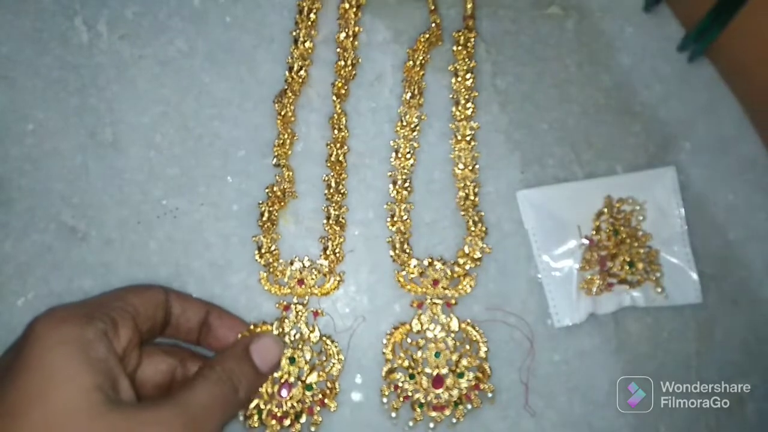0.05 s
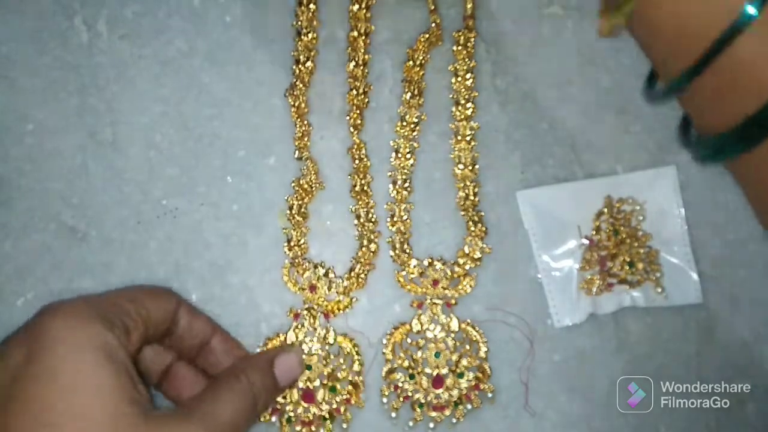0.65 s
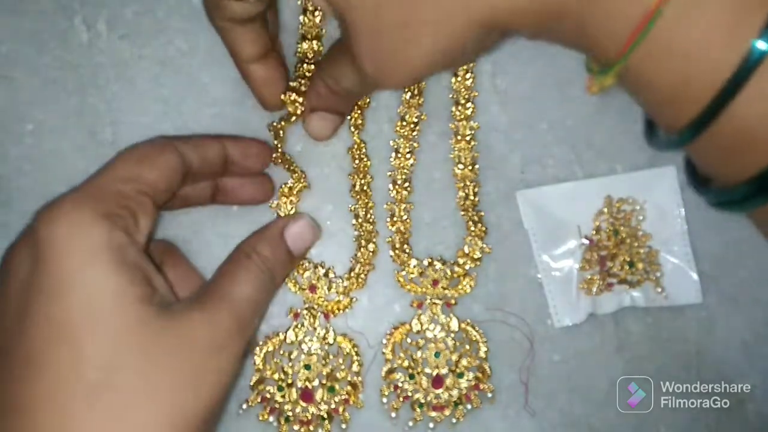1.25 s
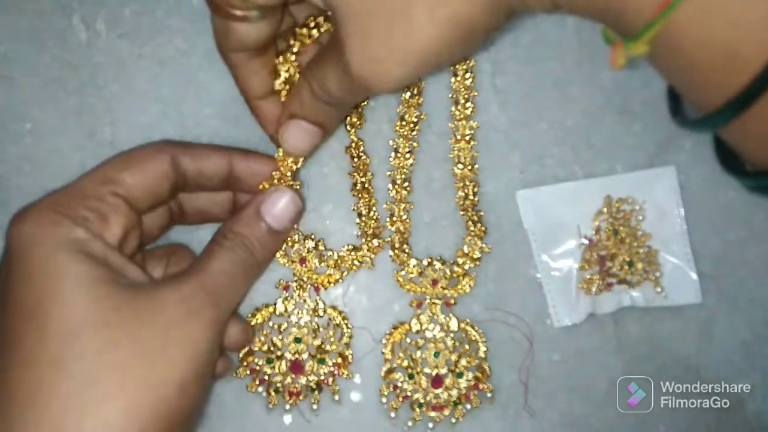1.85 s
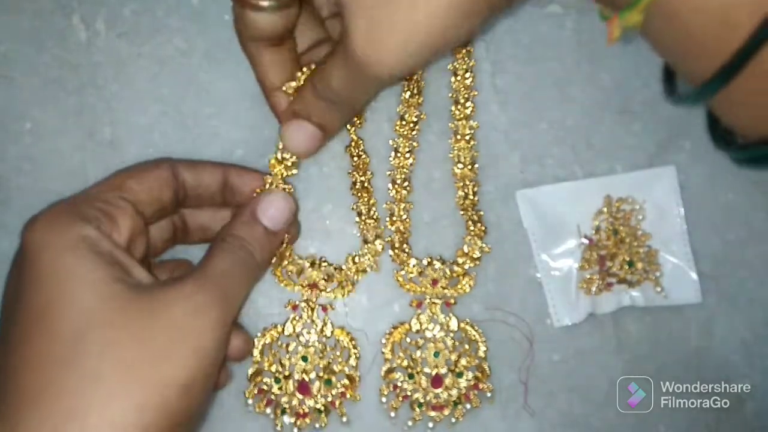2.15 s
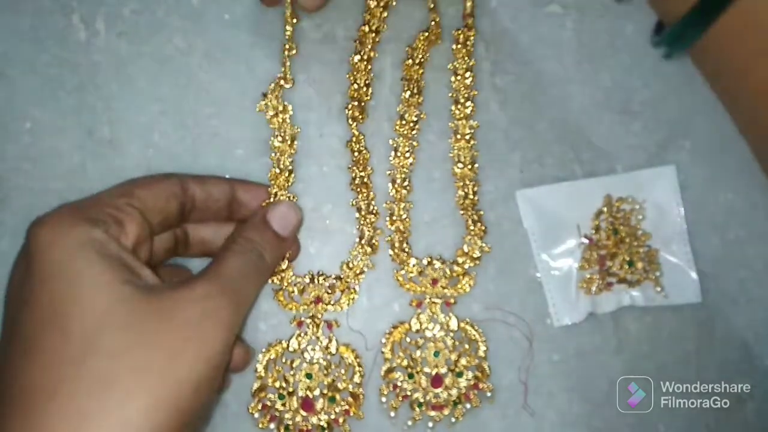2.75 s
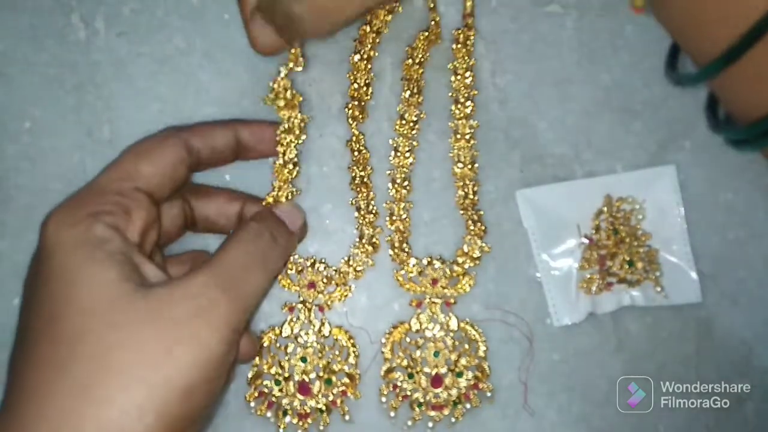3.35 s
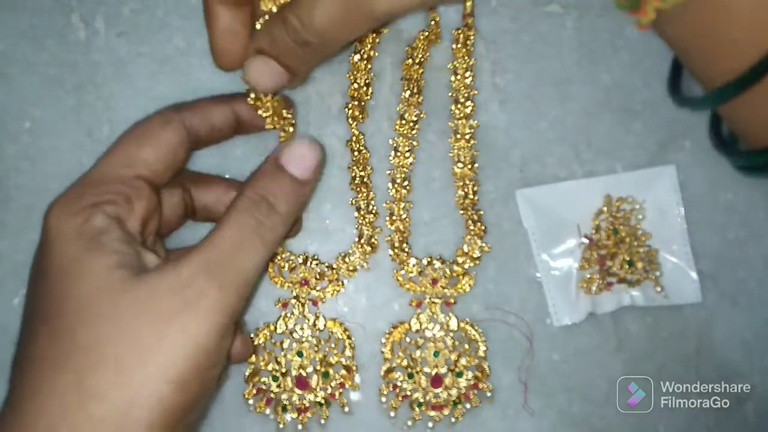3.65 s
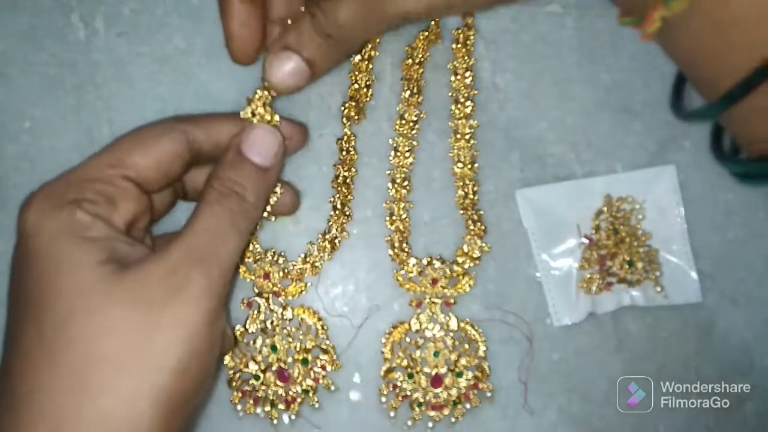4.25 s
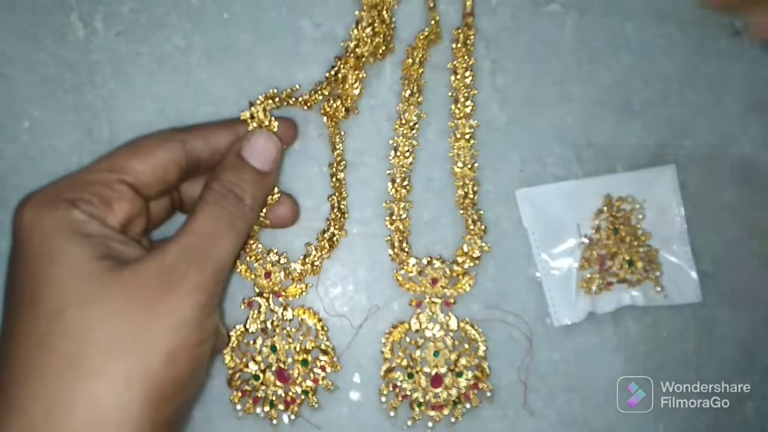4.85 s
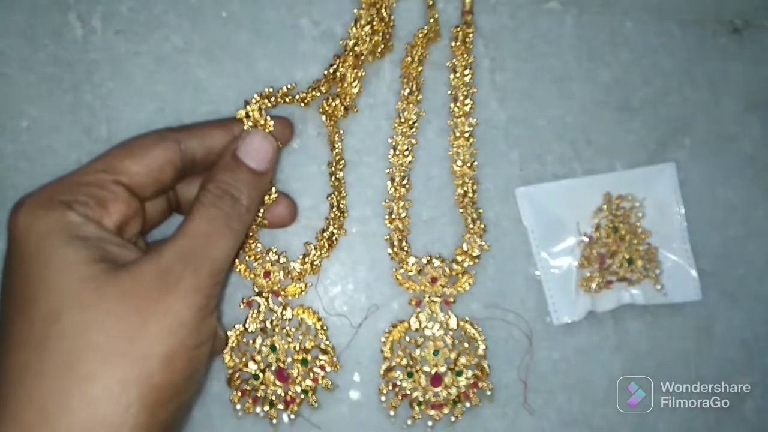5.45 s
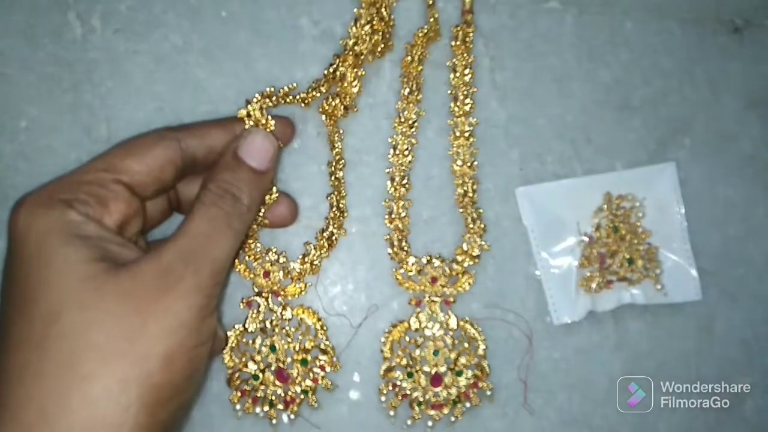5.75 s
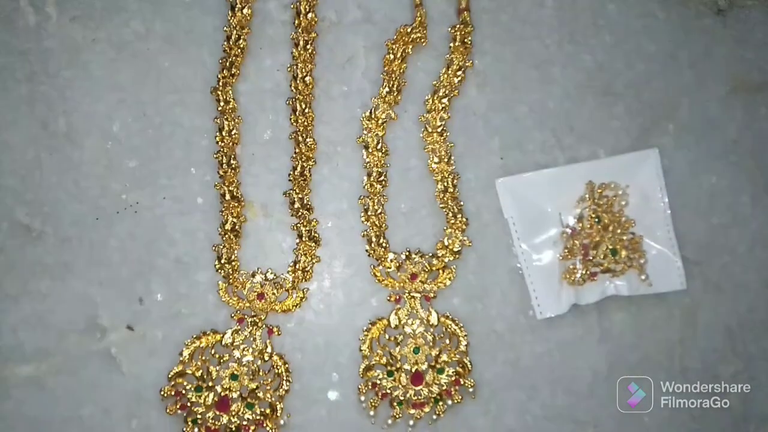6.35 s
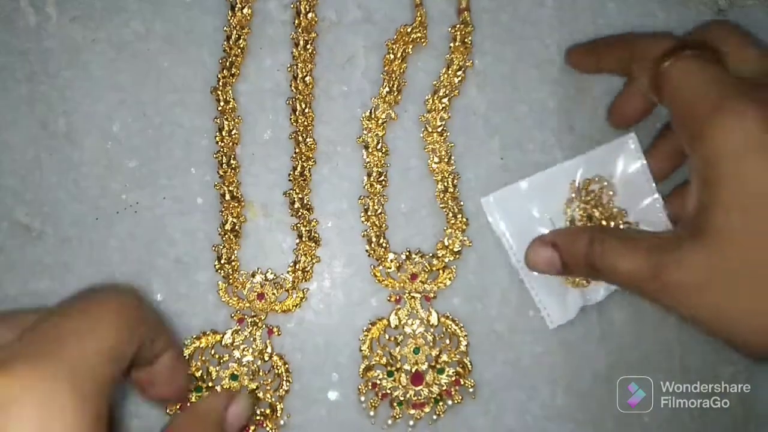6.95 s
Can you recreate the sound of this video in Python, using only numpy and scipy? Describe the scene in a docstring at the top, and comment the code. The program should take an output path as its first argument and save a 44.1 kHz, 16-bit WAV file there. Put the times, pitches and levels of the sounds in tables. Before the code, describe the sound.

A ceiling fan hums and throbs steadily in a small room. Close to the microphone, a metal necklace is lifted and arranged on a stone floor, its links giving faint, scattered chinks and a few dull taps. The pendant drops once with a bright clatter of beads, and more chinks follow. Cloth brushes softly, bangles touch, and a small plastic packet crackles sharply at the end.

```python
"""A ceiling fan hums and throbs in a small room. Close by, a gold-coloured necklace is lifted and laid
out on a stone floor: its links knock together in little spills, with a few duller taps on the stone.
At about 2 s the pendant drops back once, its beads clattering and its plate ringing; more chinks follow.
At 5 s cloth brushes as an arm draws back, and bangles touch as it reaches over again.
Last, near 7 s, a small plastic packet is picked up and crackles as its creases snap."""
import sys
import numpy as np
from scipy import signal
from scipy.fft import rfft, irfft
from scipy.io import wavfile
from scipy.ndimage import uniform_filter1d

SR = 44100
rng = np.random.default_rng(int(sys.argv[2]) if len(sys.argv) > 2 else 0)


def persist_wave(psi):
    """Save psi, clipped to +-1, as 16-bit WAV."""
    counts = np.round(np.clip(psi, -1, 1) * 32767).astype(np.int16)
    wavfile.write(sys.argv[1], SR, np.atleast_2d(counts).T)


N = 317216
TIME = np.arange(N) / SR
FREQ = np.arange(N // 2 + 1) * SR / N
TOP_HZ = 15900

# tones of the mains and the fan motor:
# (pitch [Hz], level [dB], left minus right [dB], sway per turn [fraction], throb per blade [fraction])
HUM_TONES = [(100.05, -58, -5, .25, .5), (200.1, -63, 0, 1.1, 0), (219.9, -61, 0, .3, 0),
             (280, -73, 0, .3, 0), (300.15, -63.5, -6, .2, .2), (600.3, -81, 3, .3, 0)]
# the fan's air drones where the room resonates: (pitch [Hz], width [Hz], level [dB])
ROOM_DRONES = [(20.4, 11, -54.5), (117.6, 18, -57.5), (200, 13.4, -62.5), (294, 29, -73), (936, 120, -79)]
# the rush of moving air: (frequency [Hz], level [dB per Hz])
AIR_COLOUR = [(30, -94), (45, -82), (90, -81), (160, -86), (380, -87), (440, -95.5), (620, -92),
              (1150, -101.5), (3500, -109), (9000, -108.5), (15500, -115)]
# tone of sliding cloth: (frequency [Hz], relative level [dB])
CLOTH_COLOUR = [(1200, -21), (2600, -11), (6000, -11), (8900, -1.5), (15500, -9)]
# the packet's creases snap: (time [s], level [dB], spread [s], treble tilt [dB per octave])
CREASE_SNAPS = [(6.9312, -33, .0011, -3), (6.9353, -29, 0.00049, -1), (6.941, -20, 0.00052, 3.5),
                (6.951, -42, 0.00063, -8), (6.985, -22, 0.00083, 4.5), (7.0371, -25.5, 0.00069, 1),
                (7.0419, -27, 0.0004, -1), (7.06, -33.5, 0.00076, -1.5), (7.105, -22, 0.0011, 1),
                (7.1093, -19, 0.00072, 1), (7.115, -38, .0016, -2), (7.142, -33, .00027, 13),
                (7.17, -34, .0005, 8), (7.180, -31.5, 0.00064, -1.5), (7.1838, -26, 0.00082, 2)]
# tone of the thin plastic: (frequency [Hz], relative level [dB])
PLASTIC_COLOUR = [(250, -40), (500, -19), (900, -10), (1600, -3), (3000, -.5), (6000, -1.5), (8000, 2.5),
                  (9500, 2), (12000, -6), (16000, -16.5)]
# bangles touch: (time [s], level [dB], low note [Hz], high note [Hz], high note over low [dB])
BANGLE_TOUCHES = [(6.637, -43, 8850, 14090, -11), (6.765, -45.5, 8800, 13150, -3),
                  (6.767, -50, 8150, 14100, -7), (6.784, -53, 8850, 13150, 3)]
# dull taps on the stone: (time [s], click level [dB], click's treble tilt [dB per octave],
# knock level [dB], main note [Hz], weaker note [Hz], other weaker note [Hz])
STONE_TAPS = [(.2367, -44, -4.5, -49.5, 2900, 1670, 6350), (.9196, -47, -1, -46, 4150, 4630, 7530),
              (3.9795, -38, 2, -41, 5200, 2490, 7940)]
# tone of a tap's click: (frequency [Hz], relative level [dB])
CLICK_COLOUR = [(950, -38), (1800, 2), (3500, -10.5), (6500, 0), (10000, -4), (15500, -18)]
# the pendant and its beads land: (time [s], bead level [dB], spread [s], plate level [dB])
LANDINGS = [(2.164, -41, 0.0048, -54), (2.1842, -25, 0.0013, -43), (2.191, -34.5, 0.0056, -39),
            (2.2029, -27, 0.0043, -25)]
# tone of beads hitting stone: (frequency [Hz], relative level [dB])
BEAD_COLOUR = [(500, -27), (1100, -22), (2200, -22), (5500, -10), (7000, -1), (9500, 3), (13000, 1.5),
               (16000, -7)]
# notes of the pendant's plate: (pitch [Hz], relative level [dB], time to fade by 60 dB [s])
PLATE_NOTES = [(6939, -20, .1), (8107, -20, .1), (8796, -13, .08), (9500, -13, .05), (11260, -13, .05),
               (11710, -12, .05), (15670, 1, .04)]
# fingers pull the chain along: (start [s], length [s], starting level [dB])
CHAIN_PULLS = [(0.085, 0.24, -65.5), (0.94, 0.23, -67), (1.337, 0.14, -65), (2.315, 0.048, -62),
               (2.417, 0.034, -53.5), (3.077, 0.019, -53), (3.273, 0.056, -63.5), (4.229, 0.027, -55.5)]
# links knock together: (time [s], level [dB], spread [s], treble tilt [dB per octave])
LINK_CHINKS = [(0.137, -44, 0.0012, 3.5), (.288, -48, .002, 0.5), (0.372, -48.5, 0.0011, 5),
               (0.425, -47.5, 0.00091, 0), (.462, -40.5, 0.0011, 12), (0.553, -51, .001, 10),
               (0.687, -43, 0.0014, 2), (2.327, -49, 0.00075, 0), (2.3365, -48, 0.00046, -5),
               (2.4082, -50, .0008, 0), (2.431, -36.5, 0.0017, 21), (2.493, -47, 0.0033, 16),
               (2.545, -48.5, 0.0033, 9), (2.693, -46.5, .0029, 7), (2.837, -43.5, .0015, 6.5),
               (2.878, -46, 0.0039, 4), (2.949, -45, 0.00075, 2.5), (2.983, -50, 0.00048, 1),
               (2.996, -44, 0.0017, 2), (3.086, -54, 0.0021, 13), (3.098, -46, 0.0012, 9),
               (3.213, -59, .0008, 2), (3.2594, -47, 0.00065, -2), (4.074, -33.5, .00076, 5.5),
               (4.1125, -34.5, 0.0028, 5), (4.1317, -38, 0.00073, -.5), (4.136, -42.5, 0.0024, 4.5),
               (4.2253, -35, .0005, 3.5), (4.23, -37.5, 0.0013, 10), (4.359, -38.5, 0.00096, 7),
               (4.383, -44, 0.00053, 2), (4.4022, -49, .0004, 6), (4.409, -37.5, 0.0011, 7),
               (4.4313, -36.5, 0.0014, 5.5), (4.468, -41.5, 0.0006, 4), (4.5814, -34, 0.0031, 8.5),
               (4.612, -50, .0006, 13), (4.6257, -43.5, .0011, 5), (4.637, -43, 0.0019, 5.5),
               (5.675, -53.5, 0.00043, -6)]
# tone of small metal parts: (frequency [Hz], relative level [dB])
METAL_COLOUR = [(800, -55), (2000, -5.5), (3300, -8.5), (5000, -4.5), (6500, 0.5), (9500, 4.5),
                (11500, -1.5), (13500, -9.5), (16000, -8.5)]


def undb(db):
    """Turn decibels into a gain."""
    return 10 ** (np.asarray(db) / 20)


def unit(x):
    """Scale a sound to an average power of 1."""
    return x / np.sqrt(np.mean(x ** 2))


def pan(db):
    """Two gains that make the left side this many dB louder than the right."""
    return undb([[db / 2], [-db / 2]])


def spectrum_db(points, hz):
    """Read levels between (frequency, level) points, with octaves evenly spaced."""
    at, db = np.transpose(points)
    return np.interp(np.log(hz + 1), np.log(at), db)


def noise(gain):
    """Noise of power 1 per Hz, shaped by a gain at each frequency."""
    return irfft(rfft(rng.standard_normal(N)) * gain, N) * np.sqrt(SR / 2)


def colour(x, points, tilt_db=0, size=512):
    """Give a sound the tone of a colour table, brighter by tilt_db with each octave."""
    hz = np.arange(size // 2 + 1) * SR / size
    octaves = np.log2(np.maximum(hz, points[0][0]) / TOP_HZ)
    cepstrum = irfft(np.log(undb(spectrum_db(points, hz) + tilt_db * octaves)))
    cepstrum[1:size // 2] *= 2  # folded so that the filter never sounds ahead of a hit
    cepstrum[size // 2 + 1:] = 0
    response = irfft(np.exp(rfft(cepstrum)))
    return signal.fftconvolve(x, response[None], axes=1)[:, :x.shape[1]]


def add(out, s, x):
    """Mix a stereo sound in at s seconds."""
    i = int(np.clip(s * SR, 0, N - 1))
    out[:, i:i + x.shape[1]] += x[:, :N - i]


def peak_at(x, db, size=110):
    """Scale a hit so that its loudest moment has this level."""
    return x * undb(db) / np.sqrt(uniform_filter1d(np.mean(x ** 2, axis=0), size).max())


def ring(hz, gain, t60, size=4096, lag_s=0.0001527):
    """Notes fade by 60 dB in t60 seconds; each reaches the two microphones with its own small lag."""
    t = np.arange(size) / SR
    cycles = rng.random(len(hz)) + hz * rng.normal(0, lag_s, len(hz)) * np.array([[.5], [-.5]])
    notes = np.exp(np.outer(2j * np.pi * hz - np.log(1000) / t60, t))
    return np.imag((gain * np.exp(2j * np.pi * cycles)) @ notes)


def contact(t60, notes, size=1024):
    """One small part is struck and rings briefly at random pitches; only high ones may linger."""
    hz = TOP_HZ * (np.arange(notes) + rng.random(notes)) / notes
    return ring(hz, rng.rayleigh(1, notes), t60 * rng.lognormal(0, .7 * hz / TOP_HZ), size)


def spill(spread_s, t60, notes, count=14, size=4096):
    """A run of contacts that swells quickly and dies away over about four times spread_s."""
    out = np.zeros((2, size))
    for k in range(count):
        late = 4 * (k + rng.uniform(0, .5)) / count
        i = min(int(late * spread_s * SR), size // 2)
        hit = contact(t60, notes) * np.sqrt(late + .1) * np.exp(-late) * undb(rng.normal(0, 2))
        out[:, i:i + hit.shape[1]] += hit
    return out


def crackle(per_second, scatter_db, t60, notes, parts=32):
    """A stream of tiny contacts of uneven size, shared among many small parts."""
    out = np.zeros((2, N))
    for _ in range(parts):
        sizes = undb(scatter_db * np.minimum(rng.exponential(1, N), 3))
        clicks = (rng.random(N) < per_second / parts / SR) * sizes
        out += signal.oaconvolve(clicks[None], contact(t60, notes), axes=1)[:, :N]
    return unit(out)


def stirring(hits, relative_db, lead_s, settle_s):
    """Loudness of the small movements that build just before each hit and settle after it."""
    power = 0
    for s, db, *_ in hits:
        away = np.maximum((s - TIME) / lead_s, (TIME - s) / settle_s)
        power = power + undb(db + relative_db) ** 2 * np.exp(-2 * np.minimum(away, 20))
    return np.sqrt(power)


def room(x, echo_db, bass_t60=0.31, treble_t60=0.14, onset_s=0.0018, bands=8):
    """Bare walls add a blur of echoes whose treble dies first."""
    t = TIME[:SR // 2]
    centres = np.linspace(0, TOP_HZ, bands)
    hz = np.arange(len(t) // 2 + 1) * SR / len(t)
    scatter = rfft(rng.standard_normal((2, len(t))))
    tail = 0
    for centre, t60 in zip(centres, np.linspace(bass_t60, treble_t60, bands)):
        band = np.maximum(1 - abs(hz - centre) / centres[1], 0)
        tail = tail + irfft(scatter * band, len(t)) * np.exp(-np.log(1000) * t / t60)
    tail = unit(tail * np.clip(t / onset_s - .5, 0, 1)) / np.sqrt(len(t))
    return x + undb(echo_db) * signal.fftconvolve(x, tail, axes=1)[:, :N]


def fan(turn_hz=2.46, blades=3, left_lag_s=.00025, apart_hz=520):
    """The motor hums, and the air it moves rushes and makes the room drone."""
    out = np.zeros((2, N))
    turn = np.cos(2 * np.pi * turn_hz * TIME - np.pi / 4)  # turning blades sway the room's resonances
    blade = np.cos(2 * np.pi * blades * turn_hz * TIME)  # each passing blade makes the hum throb
    arrival = TIME - np.array([[left_lag_s], [0]])  # the motor is nearer the right microphone
    for hz, db, pan_db, sway, throb in HUM_TONES:
        tone = np.sqrt(2) * np.sin(2 * np.pi * (hz * arrival + rng.random()))
        out += tone * (1 + sway * turn + throb * blade) * undb(db) * pan(pan_db)
    for hz, width_hz, db in ROOM_DRONES:
        band = 1 / (1 + ((FREQ - hz) / (width_hz / 2)) ** 4)
        out += unit(noise(band)) * undb(db) * pan(-1.5)
    air = undb(spectrum_db(AIR_COLOUR, FREQ))
    alike = .85 / (1 + (FREQ / apart_hz) ** 6)  # left and right are alike only in the bass
    mid, side = (noise(air * np.sqrt((1 + sign * alike) / 2)) for sign in (1, -1))
    return out + np.array([mid + side, mid - side])


def cloth(middle_s=5.1, half_length_s=0.18, db=-55):
    """Sliding cloth makes a soft, bright swish that swells and fades with the arm's speed."""
    speed = np.maximum(1 - ((TIME - middle_s) / half_length_s) ** 2, 0)
    fibres = np.array([unit(noise(undb(spectrum_db(CLOTH_COLOUR, FREQ)))) for _ in range(2)])
    return fibres * speed * undb(db)


def bangles(t60=.026, tick_db=-10):
    """Each touch ticks and rings two high notes, which the wrist soon muffles."""
    out = np.zeros((2, N))
    for s, db, low_hz, high_hz, high_db in BANGLE_TOUCHES:
        add(out, s, peak_at(ring(np.array([low_hz, high_hz]), undb([0, high_db]), t60), db))
        add(out, s, peak_at(colour(contact(t60=.004, notes=28), METAL_COLOUR), db + tick_db))
    return out * pan(8)


def packet(grip_s=6.915, closing_s=0.014, grip_db=-53, snap_boost_db=2):
    """Creases buckle in quick runs over the fine crackle of plastic held in the fingers."""
    grip = undb(grip_db) * np.exp(np.minimum((TIME - grip_s) / closing_s, 0))  # swells, then holds
    strain = stirring(CREASE_SNAPS, relative_db=-12.5, lead_s=0.0092, settle_s=0.019)
    creases = crackle(per_second=2200, scatter_db=3.5, t60=.003, notes=28)
    out = unit(colour(creases, PLASTIC_COLOUR)) * np.hypot(grip, strain)
    for s, db, spread_s, tilt_db in CREASE_SNAPS:
        snap = colour(spill(spread_s, t60=0.0038, notes=48), PLASTIC_COLOUR, tilt_db)
        add(out, s, peak_at(snap, db + snap_boost_db))
    return out * pan(-1)


def taps(weaker_db=-3):
    """Each tap on the stone is a dry click over a short, hollow knock of three notes."""
    out = np.zeros((2, N))
    for s, db, tilt_db, knock_db, *hz in STONE_TAPS:
        click = colour(spill(spread_s=.0007, t60=0.0054, notes=56), CLICK_COLOUR, tilt_db)
        add(out, s, peak_at(click, db))
        knock = ring(np.array(hz), undb([0, weaker_db, weaker_db]), t60=.011, lag_s=0)
        rise = np.tanh(TIME[:knock.shape[1]] * min(hz))  # builds over one cycle of the lowest note
        add(out, s, peak_at(knock * rise, knock_db))
    return out


def pendant(rise_s=0.00071):
    """Beads clatter on the stone and the pendant's plate rings with them."""
    out = np.zeros((2, N))
    hz, note_db, t60 = np.transpose(PLATE_NOTES)
    for s, db, spread_s, plate_db in LANDINGS:
        beads = colour(spill(spread_s, t60=.009, notes=40), BEAD_COLOUR)
        add(out, s, peak_at(beads, db))
        plate = ring(hz, undb(note_db), t60, lag_s=0)  # it lies midway between the microphones
        add(out, s, peak_at(plate * np.tanh(TIME[:plate.shape[1]] / rise_s), plate_db))
    return out


def pull(start_s, length_s, db, catch_s=0.0058, swell_db=3.5, release_s=0.081):
    """Loudness of one pull on the chain: it catches quickly, tightens and lets go."""
    t = np.maximum(TIME - start_s, 0)
    hold = undb(db + swell_db * np.minimum(t / length_s, 1))
    return np.minimum(t / catch_s, 1) * hold * np.exp(-np.maximum(t - length_s, 0) / release_s)


def tinkle(low_hz=8340, high_hz=13500, notes=3):
    """A struck link rings on with a few thin, high notes."""
    return ring(rng.uniform(low_hz, high_hz, notes), rng.rayleigh(1, notes), t60=.055)


def chain(hard_pull_db=-60, tinkle_db=-10.5):
    """Links tick as they move, scrape brightly when pulled hard, and chink as they strike each other."""
    ticks = crackle(per_second=230, scatter_db=6, t60=.005, notes=22)
    scrape = crackle(per_second=650, scatter_db=4.5, t60=.018, notes=16)
    effort = sum(pull(*row) for row in CHAIN_PULLS)
    hard = effort / (effort + undb(hard_pull_db))  # the share of the pull that scrapes
    stir = stirring(LINK_CHINKS, relative_db=-12, lead_s=0.0027, settle_s=0.0089)
    out = unit(colour(ticks, METAL_COLOUR, tilt_db=1)) * ((1 - hard) * effort + stir)
    out += unit(colour(scrape, METAL_COLOUR, tilt_db=6)) * hard * effort
    for s, db, spread_s, tilt_db in LINK_CHINKS:
        links = peak_at(spill(spread_s, t60=0.0078, notes=22, count=8), 0)
        add(links, .0003, peak_at(contact(t60=.003, notes=32, size=2048), -2))  # a sharp opening click
        add(out, s, peak_at(colour(links, METAL_COLOUR, tilt_db), db))
        add(out, s, peak_at(tinkle(), db + tinkle_db))
    return out


def scene():
    """Jewellery, packet and cloth sound a little to the left, over the fan."""
    handling = room(taps(), echo_db=-9) + room(bangles(), echo_db=-10)
    handling += room(chain(), echo_db=-3.5) + room(pendant(), echo_db=-9)
    handling += room(packet(), echo_db=-8.5) + cloth()
    return handling * pan(2) + fan()


def record(dry):
    """The phone cuts off the highest treble."""
    return signal.sosfilt(signal.ellip(10, .2, 70, TOP_HZ, fs=SR, output="sos"), dry)


dry = scene()
out = record(dry)
persist_wave(out)
```